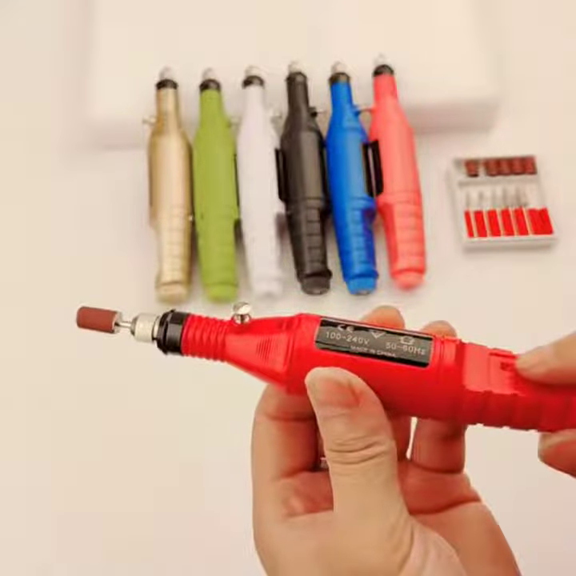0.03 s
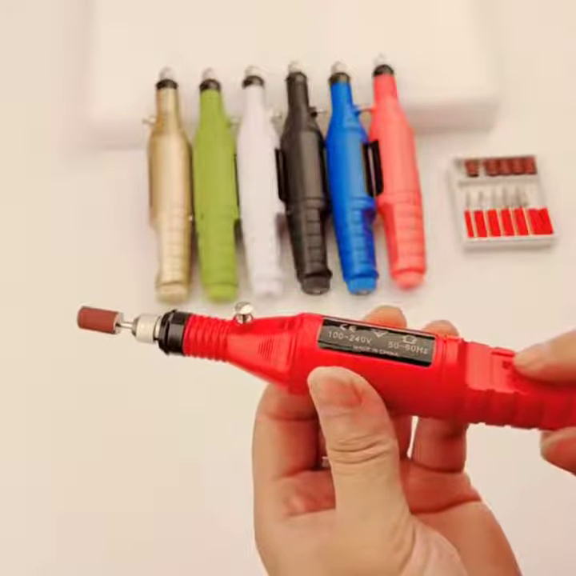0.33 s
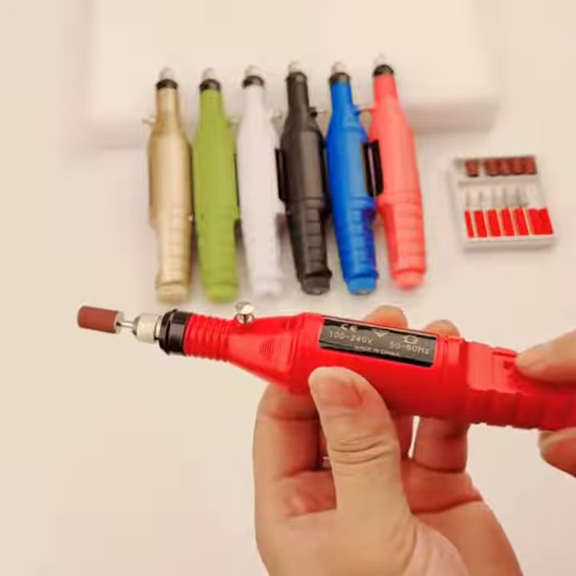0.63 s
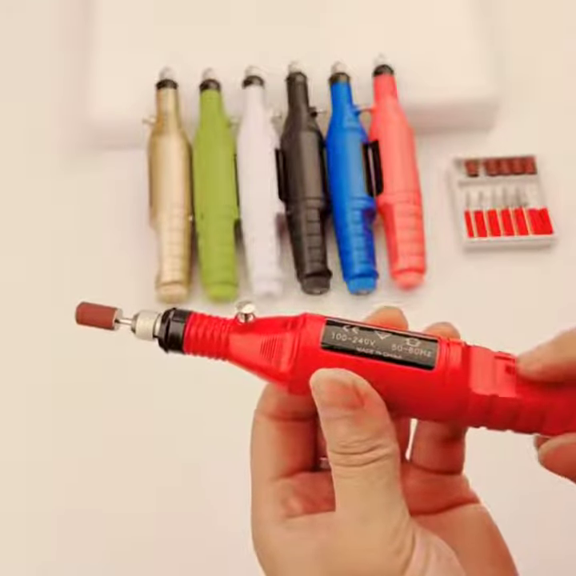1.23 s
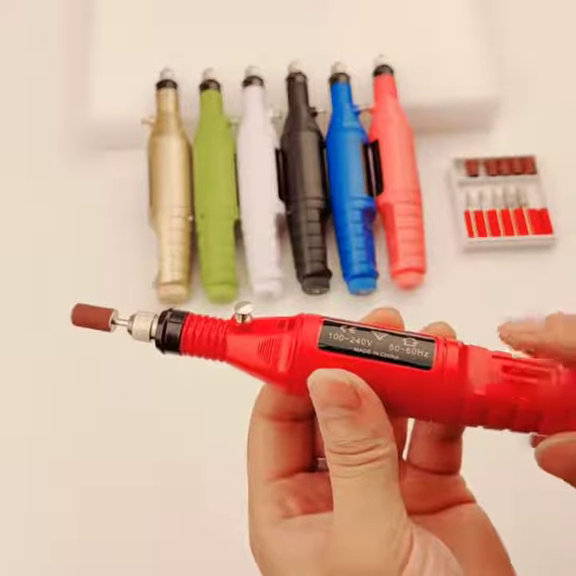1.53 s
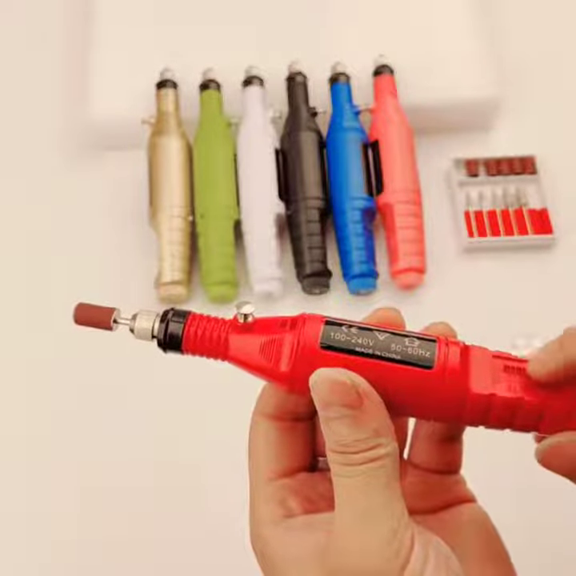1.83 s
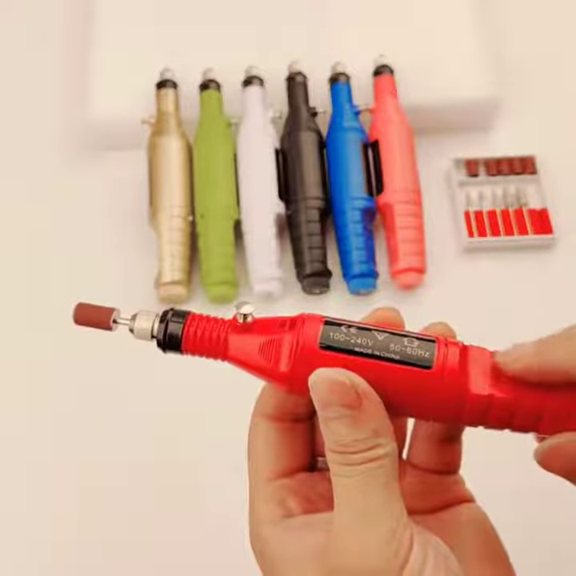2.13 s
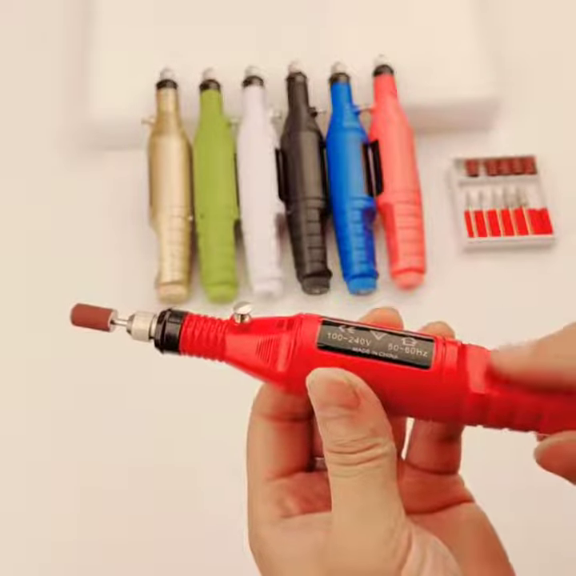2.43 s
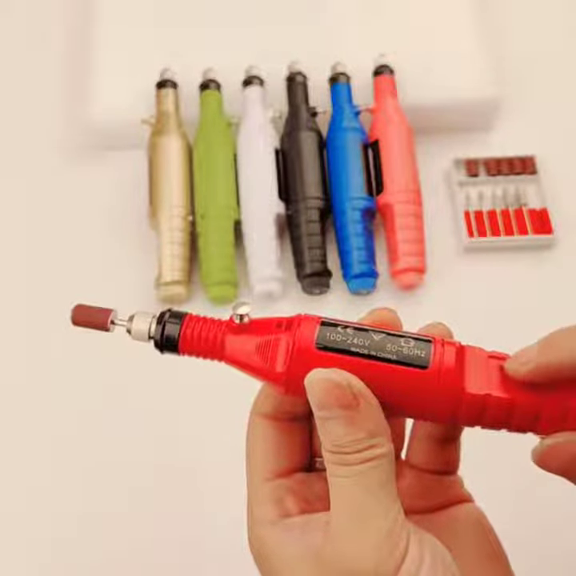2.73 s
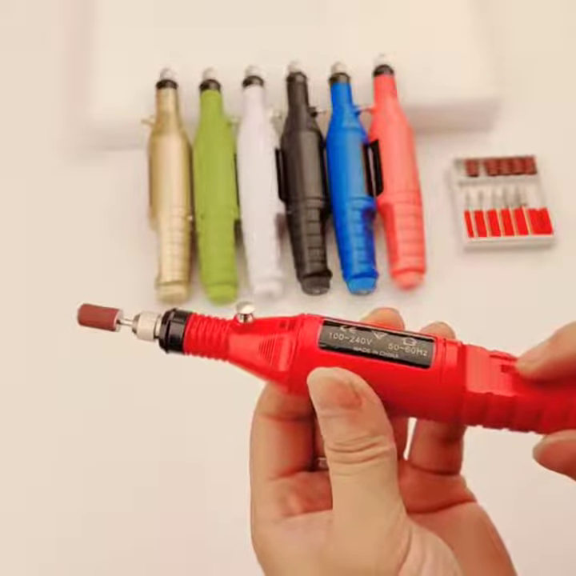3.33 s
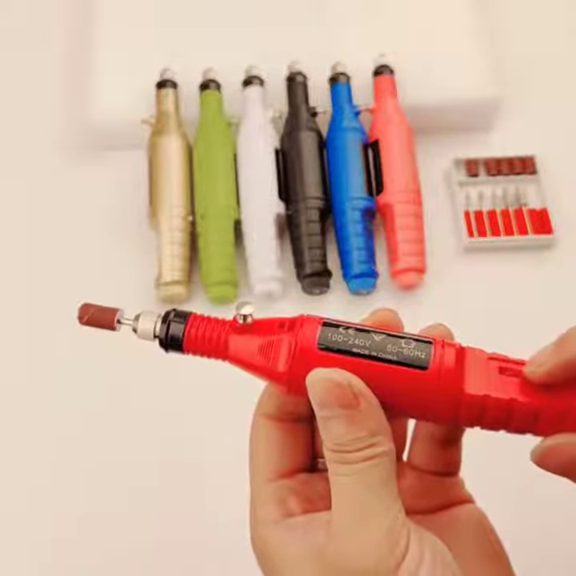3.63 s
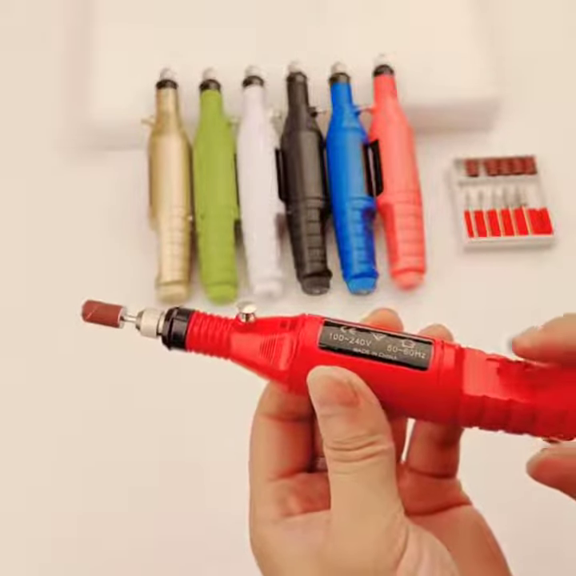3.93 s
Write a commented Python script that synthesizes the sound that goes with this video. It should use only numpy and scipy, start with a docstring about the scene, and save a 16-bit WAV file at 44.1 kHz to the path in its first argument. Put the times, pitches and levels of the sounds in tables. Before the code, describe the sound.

High whir of a handheld electric drill dropping in pitch, then stopping with a switch click.

```python
"""The high whir of a small electric nail drill, hand-held close to a stereo microphone in a small room.
Its speed is turned down in four steps; then the motor coasts, fades out and the switch clicks off.
The whine is multiples of the shaft speed sweeping through the resonances of the plastic shell.
With it the brushes rub, the shaft knocks once a turn and its unbalance hums in the handle.
Behind the drill lie a low rush of air, the room's short echo and faint room tone."""
import sys
import numpy as np
from scipy import signal
from scipy.fft import rfft, irfft
from scipy.io import wavfile

SR = 44100
rng = np.random.default_rng(int(sys.argv[2]) if len(sys.argv) > 2 else 0)


def output_pcm(signal):
    """Save a mono or channel-first signal as 16-bit PCM at the path in sys.argv[1].

    Samples are clipped to [-1, 1] before scaling.
    """
    pcm = np.clip(np.atleast_2d(signal).T, -1, 1) * 32767
    wavfile.write(sys.argv[1], SR, np.round(pcm).astype(np.int16))


N = 176400
T = np.arange(N) / SR

# The shaft under power, then coasting: time_s, speed_hz
POWERED_SPEED = [(0, 189.3), (0.42, 190.1), (0.75, 189.5), (0.85, 190.5), (1.04, 190.7), (1.35, 190.2),
                 (1.47, 182.1), (1.79, 181.6), (1.82, 178.8), (1.92, 162.9), (1.99, 153.4), (2.13, 151.4),
                 (2.29, 150.6), (2.36, 141.9), (2.41, 139.6), (2.7, 139.1), (2.81, 131.3), (2.97, 130.1),
                 (3.25, 131.2)]
COASTING_SPEED = [(3.33, 109), (3.449, 51), (3.6, 18)]
def shaft():
    """The motor steps down and coasts; gives its turns per second and the turns made so far."""
    speed_hz = curve(list(POWERED_SPEED) + COASTING_SPEED)
    return speed_hz, np.cumsum(speed_hz) / SR


# Base level of each multiple in the whine, close up: time_s, level_db
WHINE_LEVEL = [(0, -46.5), (1.3, -45.5), (1.5, -46.5), (1.8, -46.5), (1.92, -50), (2.03, -54), (2.28, -54),
               (2.42, -54.5), (2.7, -56), (2.82, -59), (3.25, -60), (3.34, -68.5), (3.58, -93),
               (3.62, -120)]
# Shaft multiples that stand out or hang back: multiple, gain_db
MULTIPLE_GAINS = [(5, -11), (9, 8), (10, 3.5), (12, 8), (13, -6.5), (14, -3.5), (15, 2), (16, -7), (17, -6),
                  (18, 6.5), (19, -6), (20, -9.5), (21, 8.5), (23, -6.5), (24, -3.5), (25, 4.5), (26, -0.5),
                  (27, 2.5), (28, 3), (31, 3), (34, 1.5), (36, 3.0), (37, -2), (39, 4), (45, 0), (48, -3.0),
                  (49, 1), (54, 7), (55, -1.5), (59, -3), (61, -2.5), (67, -1)]
# Peaks and dips of the plastic shell: pitch_hz
SHELL_PITCHES = [550, 1100, 1280, 1325, 1370, 1505, 1595, 1640, 1685, 1730, 1865, 1910, 1955, 2180, 2270,
                 2405, 2450, 2495, 2540, 2585, 2810, 2855, 2900, 2990, 3035, 3080, 3260, 3440, 3620, 3980,
                 4025, 4205, 4340, 4520, 4565, 4655, 4880, 4925, 4970, 5015, 5060, 5150, 5285, 5375, 5420,
                 5465, 5555, 5690, 5960, 6050, 6230, 6320, 6410, 6860, 7130, 7220, 7400, 7490, 7580, 7670,
                 7760, 7850, 7940, 8120, 8300, 8390, 8570, 8660, 8750, 8930, 9110, 9200, 9290, 9470, 9560,
                 9650]
# How the shell radiates toward the microphone at each of them: left_db, right_db
SHELL_GAINS = [(-10.0, -5.5), (-9.5, -9.5), (-0.5, 1), (-12, 0.5), (7, -2.5), (2.0, 4.5), (1.5, -6),
               (-6.5, 5), (-2.5, 3), (-27.5, 6.5), (-1, 3), (-2, -2), (-9.5, 9.0), (-7.5, 3.5), (-9.5, -9),
               (18.5, 18), (13.5, 13.5), (15.5, 14.5), (-4, -1.5), (12, 11.5), (2.5, 2.5), (11, 10.5),
               (-20, -15.5), (1.5, 5), (-14.5, -16), (-3.5, 5.5), (3, 13), (-4.5, -8.5), (6.5, 6.5),
               (-17.5, -1), (-2.5, 4.5), (-20.5, 8.5), (4, -0.5), (-1.0, 14), (-0.5, 5.5), (2, 16),
               (5.5, 12.5), (7.5, 9.5), (-5, 11.5), (6.5, 19.5), (1.5, 3), (1.5, 8.5), (3.5, 0), (-7, 2),
               (-3.5, 15), (-7.5, 9), (-13, 5), (-9.5, -8), (-8, -9), (8.5, 7), (-8.5, -10), (4.5, -1.5),
               (-5.5, -3), (3.5, -14.5), (0.5, -1), (-3.5, -10), (6, -4), (8.5, -18), (7, -4), (-8.5, -14),
               (0.5, -18.5), (-14.5, -10.5), (14, -11), (0.5, -18.5), (6.5, -7.5), (0, -8), (10, 5.5),
               (4, -6), (4.5, 0.5), (0.5, -9.5), (6, 1), (7.5, -7.5), (15.5, 3.0), (6.5, -12.5), (16, -2),
               (-18.5, -17)]
# Phase between the two sides of the microphone: pitch_hz, left_lead_rad
LEFT_LEAD = [(0, -1.5), (1380, 1.39), (1720, 0.95), (2070, 0.6), (2930, -0.3), (4050, 2.5), (4740, 1.5),
             (5860, 13), (6120, 13), (7410, 6.5), (8610, 11), (10500, 16)]
def whine(speed_hz, turns):
    """Slightly unsteady shaft multiples ring through the shell; four sing out near a critical speed."""
    jitter_turns, flutter_db = 0.0014, 1.1
    critical_hz, width_hz, boost_db, singing_multiples = 139.4, 4, 5, (18, 36, 39, 54)
    angle = 2 * np.pi * (turns + jitter_turns * drift(hz=50))
    base_db, gains_db = curve(WHINE_LEVEL), dict(MULTIPLE_GAINS)
    shell = np.column_stack([SHELL_PITCHES, SHELL_GAINS])
    singing_db = boost_db * np.exp(-((speed_hz - critical_hz) / width_hz) ** 2)
    tones = np.zeros((2, N))
    for multiple in range(4, 76):
        hz = multiple * speed_hz
        db = base_db + gains_db.get(multiple, 0) + singing_db * (multiple in singing_multiples)
        db += flutter_db * drift(hz=18)
        sides = amp([db + at_pitch(shell, hz, column=1), db + at_pitch(shell, hz, column=2)])
        phase = multiple * angle + 2 * np.pi * rng.random()
        lead = at_pitch(LEFT_LEAD, hz) / 2
        tones += sides * np.cos([phase + lead, phase - lead])
    return np.sqrt(2) * tones


# Brush and shaft noise, close up: time_s, level_db
RATTLE_LEVEL = [(0, -32), (1.2, -31.5), (1.42, -31), (1.6, -32.5), (1.88, -32), (2.1, -37.5), (2.32, -36.5),
                (2.55, -36.5), (2.72, -34), (2.85, -44.5), (3.24, -41.5), (3.28, -41.5), (3.33, -48),
                (3.45, -53), (3.58, -68), (3.62, -100)]
# Its colour on each side of the microphone: pitch_hz, left_db, right_db
RATTLE_COLOUR = [(300, -6, -2), (1000, -10.5, -4.5), (1420, -10.5, -4), (2000, 5.5, -0.5), (2600, 6.5, 3.5),
                 (3020, -2.5, -7), (3300, 3, 9), (3990, 2.5, -5), (4775, 5, 19), (5800, -2, 6.5),
                 (6500, 2, 10.5), (7350, 14, -4), (8150, -10, -4.5), (8700, 23.5, -5),
                 (11000, -42.5, -43.5)]
def rattle(turns):
    """Brushes rub all the time and the shaft knocks once a turn, never twice alike."""
    rub, knock_decay_turns, knock_spread_db = 0.54, 0.18, 3
    strength = amp(knock_spread_db * rng.standard_normal(1000))[turns.astype(int)]
    knocks = strength * np.exp(-(turns % 1) / knock_decay_turns)
    shared, left, right = (rub + knocks) * rng.standard_normal((3, N))
    left = colour(left + 1.4 * shared, RATTLE_COLOUR, column=1)
    right = colour(right + 1.1 * shared, RATTLE_COLOUR, column=2)
    return amp(curve(RATTLE_LEVEL)) * unit_rms(np.array([left, right]))


# Hum of the handle, dead centre: time_s, level_db
HUM_LEVEL = [(0, -45.5), (.9, -47), (1.3, -53.5), (1.7, -47.5), (2.1, -67), (2.7, -60.5), (3.1, -63.5),
             (3.3, -62), (3.55, -71.5)]
def hum(turns):
    """The unbalanced shaft shakes the whole handle, a wavering tone at shaft speed."""
    level_db = curve(HUM_LEVEL) + 1.6 * drift(hz=17)
    return np.sqrt(2) * amp(level_db) * np.sin(2 * np.pi * turns)


# The switch snaps and bounces, just right of centre: start_s, gain_db
SWITCH_SNAPS = [(3.5879, 0), (3.5891, -2.5), (3.5904, -7), (3.5929, -13), (3.5975, -15)]
# Colour of its cracks: pitch_hz, gain_db
SWITCH_COLOUR = [(590, -63.5), (1200, -45), (2000, -24), (3000, -23), (4000, -11), (4900, 1.5), (6500, -8),
                 (7500, -9.5), (9260, -12), (10000, -16.5), (13000, -50)]
# Its ringing: pitch_hz, level_db, t60_s
SWITCH_RING = [(4700, -50, 0.022), (5740, -39, 0.058), (6900, -42, 0.049)]
def switch():
    """A quick cluster of cracks in the plastic switch; the first sets it ringing."""
    crack_db, decay_s, pan_db = -11.5, 0.00056, [[-1], [1]]
    bursts = sum(amp(crack_db + db) * (T >= start_s) * np.exp(-abs(T - start_s) / decay_s)
                 for start_s, db in SWITCH_SNAPS)
    shared, left, right = bursts * rng.standard_normal((3, N))
    cracks = np.array([colour(side + 1.3 * shared, SWITCH_COLOUR) for side in (left, right)])
    age = np.maximum(T - SWITCH_SNAPS[0][0], 0)
    ring = sum(amp(db - 60 * age / t60) * np.sin(2 * np.pi * hz * age) for hz, db, t60 in SWITCH_RING)
    return (cracks + ring) * amp(pan_db)


# Rush of air and low rumble at the microphone: time_s, level_db
RUSH_LEVEL = [(0, -48), (1.5, -45), (2.1, -47), (3.3, -51.5), (3.5, -57.5), (3.65, -62.5), (3.8, -72),
              (4, -78)]
# Colours of the rush and of the quiet room: pitch_hz, gain_db
RUSH_COLOUR = [(12, -30.5), (20, 5), (35, -4.5), (48, 3.5), (60, -1.5), (97, -21.5), (183, -9.5),
               (256, -15), (334, -15), (370, -20.5), (460, -10), (509, -14), (572, -11.5), (787, -22.5),
               (1100, -30), (1430, -49), (2420, -120)]
ROOM_TONE_COLOUR = [(120, -33), (200, -6.5), (550, -9.5), (800, -14.5), (1630, -13), (3160, -22),
                    (4670, -12.5), (6260, -27), (9700, -30.5), (13000, -66)]
# How alike the air sounds on the two sides: pitch_hz, correlation
AIR_LIKENESS = [(30, 0.94), (150, 1), (350, 0.24), (1000, 0.25)]
def air(spectrum, level_db):
    """Soft air noise, centred in the bass and wide above it."""
    hz = np.fft.rfftfreq(N, 1 / SR)
    left, independent = rfft(rng.standard_normal((2, N)))
    likeness = at_pitch(AIR_LIKENESS, hz)
    right = likeness * left + np.sqrt(1 - likeness ** 2) * independent
    noise = irfft(np.array([left, right]) * amp(at_pitch(spectrum, hz)), N)
    return amp(level_db) * unit_rms(noise)


# Decay of the small room around the microphone: pitch_hz, t60_s
ROOM_DECAY = [(300, 0.16), (2500, 0.53), (5000, 0.17), (9000, 0.17)]
def room(sound):
    """Sparse reflections come back from the near walls, each band dying at its own speed."""
    shape, density, delay_samples = (2, SR // 2), 0.1, 130
    reflections = rng.standard_normal(shape) * (rng.random(shape) < density)
    hz, age, bands = signal.stft(reflections, SR, nperseg=256)
    decay = amp(-60 * age / at_pitch(ROOM_DECAY, hz)[:, None])
    tail = signal.istft(bands * decay, SR, nperseg=256)[1]
    tail = np.pad(tail / np.linalg.norm(tail[0]), ((0, 0), (delay_samples, 0)))
    return signal.fftconvolve(sound, tail, axes=1)[:, :N]


def amp(db):
    """Decibels as amplitude."""
    return 10 ** (np.asarray(db) / 20)


def unit_rms(sound):
    """The sound scaled to an RMS of one."""
    return sound / np.sqrt(np.mean(sound ** 2) + 1e-20)


def curve(rows):
    """A time table's value at every sample."""
    return np.interp(T, *np.transpose(rows))


def at_pitch(rows, hz, column=1):
    """A column of a frequency table, interpolated on a log scale of pitch."""
    rows = np.array(rows)
    return np.interp(np.log(hz + 1), np.log(rows[:, 0] + 1), rows[:, column])


def drift(hz):
    """A random wander of about unit size, with hz new values a second."""
    return np.interp(T * hz, np.arange(2000), rng.standard_normal(2000))


def colour(sound, rows, column=1):
    """Filters a sound by a frequency table."""
    gain = amp(at_pitch(rows, np.fft.rfftfreq(N, 1 / SR), column))
    return irfft(rfft(sound) * gain, N)


def scene():
    """The drill up close, with the air and the small room behind it."""
    speed_hz, turns = shaft()
    tones, rattling, click = whine(speed_hz, turns), rattle(turns), switch()
    echo = room(amp(-13) * tones + amp(-2.5) * rattling + amp(-7.5) * click)
    drill = tones + rattling + hum(turns) + click
    rush = air(RUSH_COLOUR, level_db=curve(RUSH_LEVEL))
    room_tone = air(ROOM_TONE_COLOUR, level_db=-77.5)
    return drill + echo + rush + room_tone


def record(dry):
    """The recorder's band limit cuts off the top treble."""
    cutoff_hz = 9760
    lowpass = signal.firwin(601, cutoff_hz, window=("kaiser", 9), fs=SR)
    return signal.oaconvolve(dry, lowpass[None], "same")


dry = scene()
out = record(dry)
output_pcm(out)
```